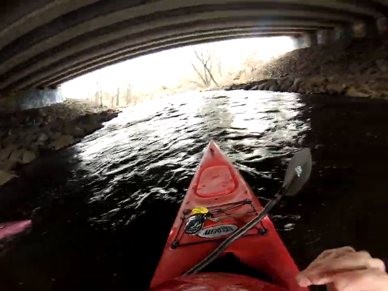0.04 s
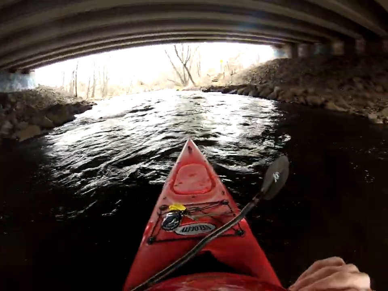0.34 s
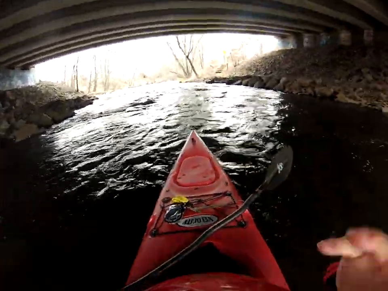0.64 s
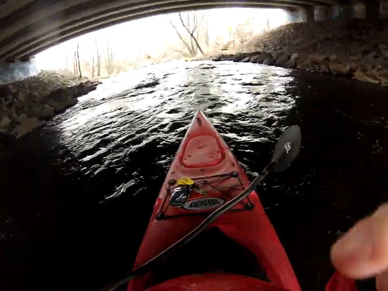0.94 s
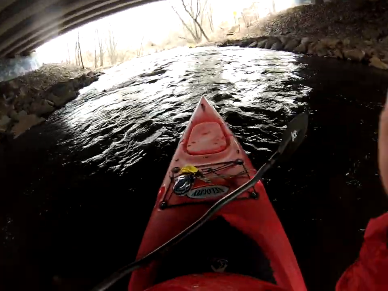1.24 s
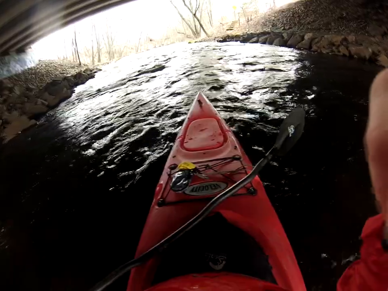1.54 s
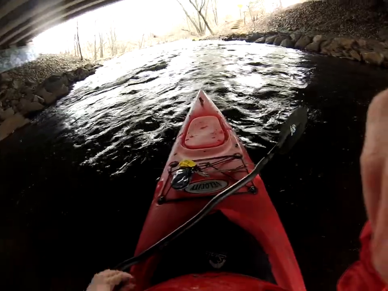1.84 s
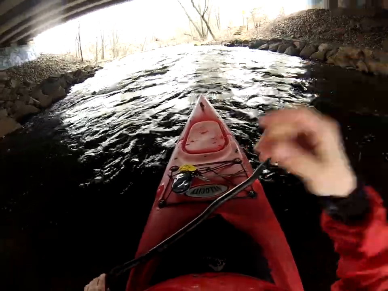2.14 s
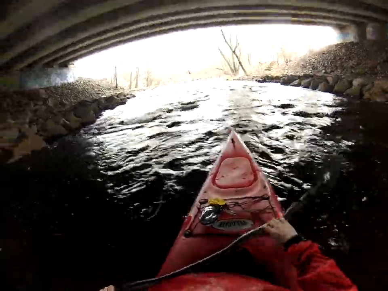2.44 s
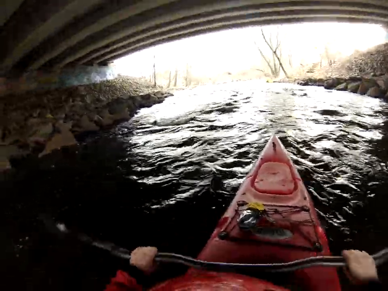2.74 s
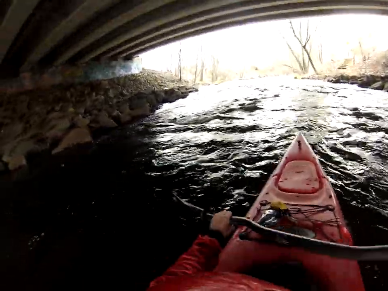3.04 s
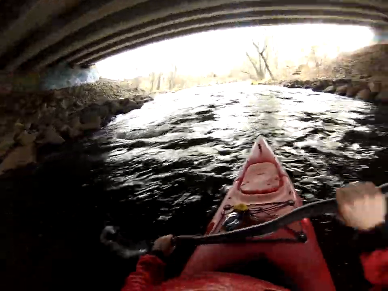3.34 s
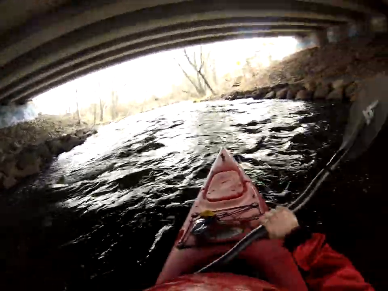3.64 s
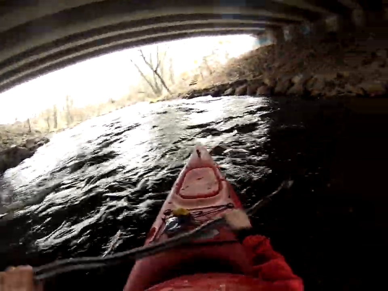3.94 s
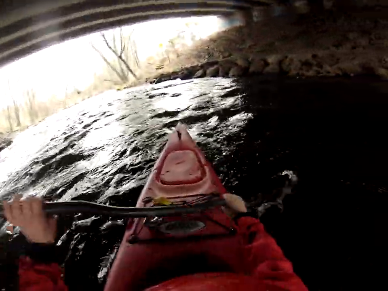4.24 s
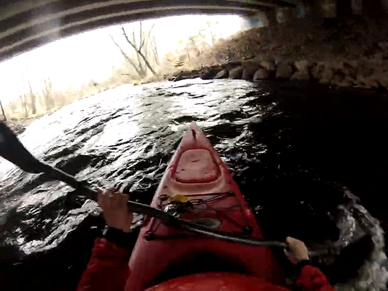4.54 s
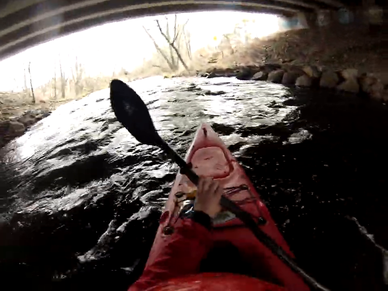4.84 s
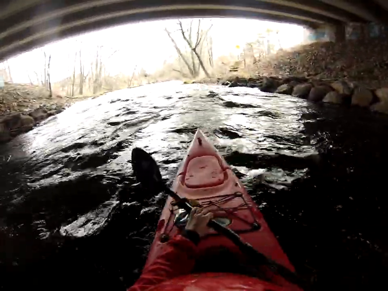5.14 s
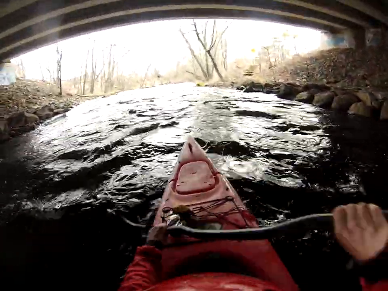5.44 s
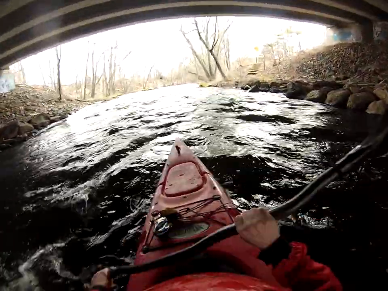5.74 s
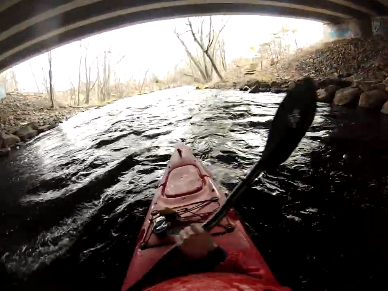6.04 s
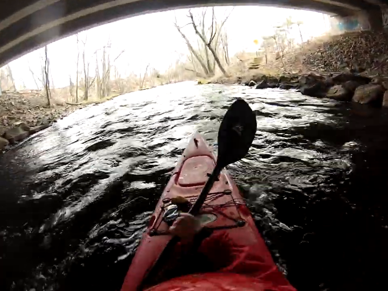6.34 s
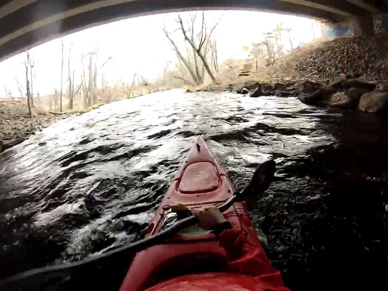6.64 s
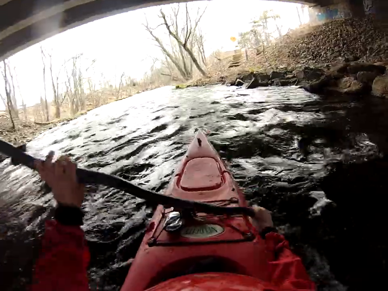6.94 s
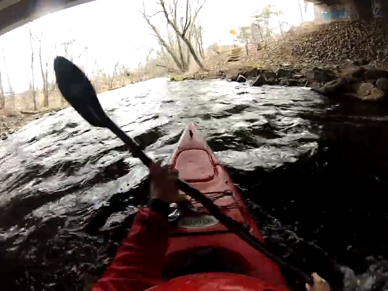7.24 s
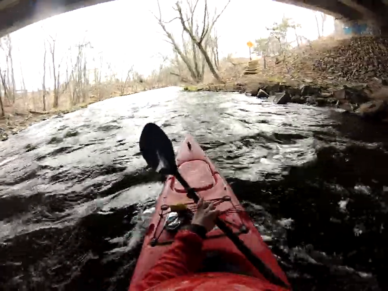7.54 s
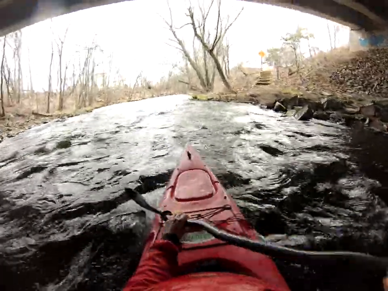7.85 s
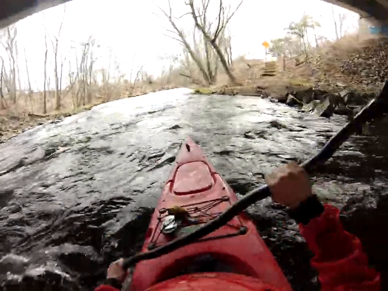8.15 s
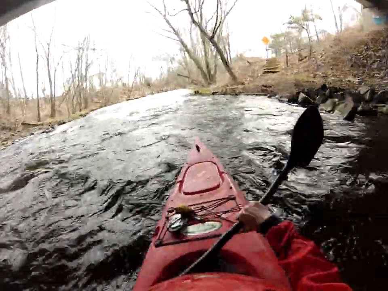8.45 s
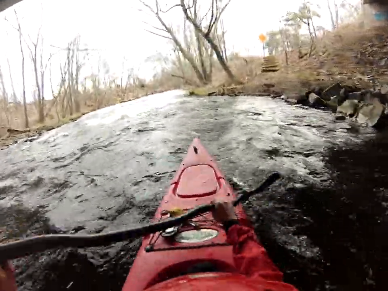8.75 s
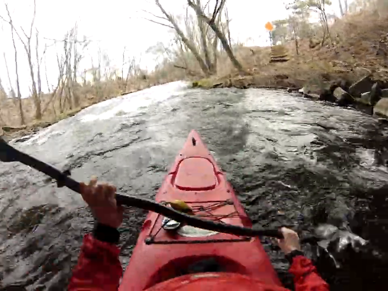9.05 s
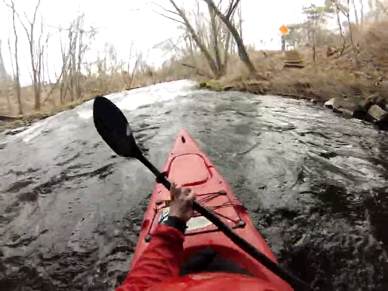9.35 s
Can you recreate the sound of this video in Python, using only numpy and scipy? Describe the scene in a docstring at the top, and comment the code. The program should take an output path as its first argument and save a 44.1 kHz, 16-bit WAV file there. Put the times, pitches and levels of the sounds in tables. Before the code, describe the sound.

Hollow-sounding river flow and soft kayak paddle strokes, with a loud burst of handling knocks and rubbing near the start.

```python
"""River water around a kayak: a wash of countless bubbles, swelling slowly as a riffle nears.
Paddle blades splash and drip faintly beside the hull. The water sounds hollow through the
waterproof case of a body-worn camera. Early on, a hand knocks and rubs the case, ringing its shell;
the springy mount thumps under the knocks and rumbles with every movement."""
import sys
import numpy as np
from scipy import signal
from scipy.fft import rfft, irfft, next_fast_len
from scipy.io import wavfile
from scipy.ndimage import uniform_filter1d

SR = 44100
rng = np.random.default_rng(int(sys.argv[2]) if len(sys.argv) > 2 else 0)


def unload_wav(signal):
    """Save mono or channel-first audio to the path in sys.argv[1] as 16-bit WAV at rate SR, clipped to [-1, 1]."""
    wavfile.write(
        sys.argv[1],
        SR,
        np.round(np.clip(np.atleast_2d(signal).T, -1, 1) * 32767).astype(np.int16),
    )


N = 414099
TIME_S = np.arange(N) / SR

# Current, louder towards the riffle: time_s, level_db
RIVER_LEVEL = [(2.1, -56), (2.71, -56), (4.23, -54.5), (5.02, -51.5), (5.53, -53), (7.21, -52.5),
               (7.86, -52), (9.39, -50.5)]
# Low band of the wash: freq_hz, relative_density_db
RUSH_SPECTRUM = [(90, -0.5), (200, -1.5), (300, -6), (500, -6.5), (780, -7.5), (1200, -5.5), (1600, 0),
                 (2200, -5.5), (2900, -12), (4500, -26), (9000, -53)]
# High band of the wash: freq_hz, relative_density_db
FIZZ_SPECTRUM = [(1500, -9.5), (2600, -6), (3600, -0.5), (5200, 0), (5800, -5.5), (7700, -6), (8400, -11.5),
                 (11000, -11), (15000, -26)]
# Paddle strokes: entry_s, pull_s, entry_splash_db, exit_splash_db, exit_jolt_db
PADDLE_STROKES = [(3.1, 0.56, -74, -63.5, -51), (4.26, 0.77, -67, -65, -44.5), (5.3, 0.4, -76, -70, -42.5),
                  (6.67, 0.47, -63, -71, -41.5), (7.76, 0.36, -62, -80, -37.5), (8.85, 0.42, -74, -68, -52)]
# Short patters of spray during and between strokes: peak_s, half_width_s, level_db
SPRAY_PATTERS = [(4.63, .074, -63.5), (5.122, 0.061, -73), (6.376, 0.056, -58.5), (8.44, 0.23, -64),
                 (8.89, .062, -61)]
# Biggest bubbles beside the hull: start_s, pitch_hz, level_db, t60_s
HULL_PLOPS = [(3.678, 1205, -50, .04), (3.904, 1720, -40.5, .02), (3.956, 775, -49.5, .042),
              (4.317, 1230, -47, .024), (4.913, 1736, -42, 0.02), (4.968, 1660, -40.5, .027),
              (5.193, 1600, -40, .013), (5.637, 856, -48, .075), (7.268, 1290, -47, 0.046),
              (7.648, 1455, -46, .069)]
# Fingers striking the case: start_s, crunch_gain_db, crunch_lowpass_hz, push_gain_db, push_s
FINGER_KNOCKS = [(.862, -1.5, 11100, -10, 0.0043), (.930, -21, 6000, -22, .0015),
                 (1.002, -23, 2000, -29, .0016), (1.1041, -11.5, 17000, -15, 0.0045),
                 (1.1139, -9, 2800, -15, 0.012), (1.1227, -22, 8000, -14, 0.0098),
                 (1.175, -15, 6000, -12, 0.0015), (1.1861, -4.5, 1980, -20.5, .011),
                 (1.1915, -10, 2000, -20, .0086), (1.272, -23, 2490, -44, 0.0055),
                 (1.311, -13, 8800, -21, 0.0087), (1.316, -7, 2620, -14, .0082),
                 (1.393, -14.5, 2320, -25, 0.0062), (1.985, -41, 2000, -30, 0.024)]
# Fingers sliding on the case, a hollow ringing under the hand:
# full_pressure_s, attack_s, hold_s, release_s, drag_db, hiss_db, sizzle_db, hollow_hz
FINGER_SLIDES = [ (0.872, .004, 0.016, 0.066, -41, -49, -60, 2220),
                 (.952, 0.0079, .005, 0.04, -41.5, -46.5, -65, 3700),
                 (0.977, 0.016, .024, .008, -43, -53, -49.5, 1640),
                 (1.114, 0.01, 0.0064, .055, -27, -26.5, -41, 2200),
                 (1.15, 0.025, 0.12, 0.033, -44.5, -47.5, -64, 1650),
                 (1.3, 0.05, .012, 0.013, -30, -25, -46, 1500),
                 (1.329, 0.06, 0.042, 0.087, -36.5, -39, -52, 2020),
                 (1.528, 0.083, 0.022, 0.051, -40.5, -47, -63, 1560),
                 (1.585, 0.063, 0.017, 0.07, -44, -51, -71, 2380),
                 (1.682, 0.059, 0.039, 0.11, -43.5, -49.5, -65, 2250),
                 (1.778, .08, 0.037, 0.096, -46.5, -51.5, -58, 1760),
                 (1.983, 0.046, .025, .04, -53.5, -54.5, -70, 1760)]
# Case resonances for outside sound: freq_hz, width_hz, boost_db
CASE_RESONANCES = [(1020, 124, 4), (1505, 360, 5), (2180, 130, 2.5), (3230, 210, -4.5), (3330, 160, 3.5),
                   (3700, 224, 7.5), (4400, 180, -4), (4780, 245, 5.5), (5760, 370, -1.5), (6650, 290, 4),
                   (7200, 320, -5), (7530, 270, 1.5), (14000, 450, 10)]
# Modes of the touched case: freq_hz, width_hz, gain_db
SHELL_MODES = [(275, 140, 6), (940, 310, -2.5), (1600, 610, 2.5), (2300, 330, 5), (2640, 550, 1),
               (3775, 104, 1.5), (4040, 100, -3), (4810, 160, 2.5), (5036, 240, -1.5), (6800, 730, -8),
               (7400, 250, -7), (7800, 400, -8.5), (9820, 1100, -11.5), (10630, 540, -10),
               (11550, 540, -9.5), (12700, 900, -14.5), (13800, 600, -13), (14620, 250, -16),
               (15000, 300, -15)]
# Modes of the camera on its mount: freq_hz, width_hz, gain_db
SWING_MODES = [(48.7, 9, 14.5), (68, 26, 8), (84.5, 45, 1), (165, 24, -0.5)]
# Mount wobble: freq_hz, relative_density_db
WOBBLE_SPECTRUM = [(8, 9), (14, 3), (24, -1.5), (36, -1.5), (48, 1), (60, -10.5), (80, -22.5), (120, -30.5),
                   (300, -44)]
# Paddler reaching and shifting: peak_s, half_width_s, level_db
BODY_SWAYS = [(.14, 0.077, -36.5), (1.405, 0.13, -29), (1.755, 0.2, -38.5), (1.978, 0.055, -31),
              (4.128, .12, -42)]


def river(babble_db=-4, spray_db=-6, surge_db=0.22, rush_db=-2.0, fizz_db=-10.0, fizz_db_per_db=1.21):
    """Far bubbles merge into a smooth wash; nearer ones stand out as babble and fizz."""
    flow_db = np.interp(TIME_S, *np.transpose(RIVER_LEVEL))
    rush_gain = from_db(flow_db + rush_db)
    fizz_gain = from_db(flow_db.mean() + fizz_db_per_db * (flow_db - flow_db.mean()) + fizz_db)
    babble = from_db(babble_db) * bubbles(1500, low_hz=350, high_hz=3004, t60_cycles=19.7, spread_db=2.5)
    spray = from_db(spray_db) * bubbles(2500, low_hz=2800, high_hz=12950, t60_cycles=83, spread_db=4.5)
    rush = coloured(rng.standard_normal(N), RUSH_SPECTRUM)
    rush += np.std(babble) * coloured(babble, RUSH_SPECTRUM)
    fizz = coloured(rng.standard_normal(N), FIZZ_SPECTRUM)
    fizz += np.std(spray) * coloured(spray, FIZZ_SPECTRUM)
    wash = rush_gain * unit_rms(rush) + fizz_gain * unit_rms(fizz)
    return wash * from_db(surge_db * drift(corner_hz=12.0))


def paddle(splash_half_width_s=0.12, spray_db=-7.5):
    """On entry and exit a blade stirs up big, low bubbles and throws drops; spray patters in between."""
    spray = bubbles(1100, low_hz=3090, high_hz=11900, t60_cycles=66, spread_db=4.0)
    spray = unit_rms(cut(spray, 6500, "low"))
    gurgle = bubbles(500, low_hz=162, high_hz=1500, t60_cycles=8.2, spread_db=2.0)
    gurgle = unit_rms(cut(gurgle, 500, "low", order=1))
    splash = sum(from_db(entry_db) * swell(entry_s, splash_half_width_s)
                 + from_db(exit_db) * swell(entry_s + pull_s, splash_half_width_s)
                 for entry_s, pull_s, entry_db, exit_db, _ in PADDLE_STROKES)
    return splash * gurgle + (from_db(spray_db) * splash + swells(SPRAY_PATTERS)) * spray


def drips(count=16, low_hz=3310, high_hz=7260, drip_db=-55, spread_db=1.5, drip_t60_s=0.022, rise=0.072):
    """Plops and small random drips: each trapped bubble rings, rising in pitch near the surface."""
    first_entry_s, first_pull_s = PADDLE_STROKES[0][:2]
    small = [(rng.uniform(first_entry_s + first_pull_s, N / SR),
              low_hz * (high_hz / low_hz) ** rng.random(),
              drip_db + spread_db * rng.standard_normal(),
              drip_t60_s) for _ in range(count)]
    out = np.zeros(N + SR)
    for start_s, pitch_hz, level_db, t60_s in HULL_PLOPS + small:
        age_s = np.arange(int(t60_s * SR)) / SR
        decay = np.exp(-np.log(1000) * age_s / t60_s)
        phase_rad = 2 * np.pi * pitch_hz * age_s * (1 + rise * age_s / t60_s)
        start = int(start_s * SR)
        out[start:start + len(age_s)] += from_db(level_db) * decay * np.sin(phase_rad)
    return out[:N]


def knocks(contact_s=0.001, tail_db=-23, tail_s=0.0081, shell_low_hz=1150, mount_top_hz=330):
    """A finger lands with a short crunch on the shell; its push sets the mount swinging."""
    crunch, push = np.zeros(N), np.zeros(N)
    age_s = np.arange(SR // 20) / SR
    decay = np.exp(-age_s / contact_s) + from_db(tail_db) * np.exp(-age_s / tail_s)
    for start_s, crunch_db, lowpass_hz, push_db, push_s in FINGER_KNOCKS:
        start = round(start_s * SR)
        span = slice(start, start + len(age_s))
        slips = decay * rng.choice([-1, 1], len(age_s))
        crunch[span] += from_db(crunch_db) * cut(slips, lowpass_hz, "low")
        push[span] -= from_db(push_db) * np.sin(np.pi * np.minimum(age_s / push_s, 1)) ** 2
    swing = sum(from_db(db) * resonance(push + 1e-18, hz, width_hz) for hz, width_hz, db in SWING_MODES)
    # Stiff shell: highs. Heavy camera: lows.
    return cut(shell_ring(crunch), shell_low_hz, "high") + cut(swing, mount_top_hz, "low")


def rubbing(low_hz=250, split_hz=3000, sizzle_hz=9000, hollow_db=10, hollow_width_hz=600, stutter_db=2):
    """Skin sticks and slips on the shell: coarse slips drag low, fine ones hiss and sizzle."""
    coarse = cut(shell_ring(clicks(per_s=6100, spread_db=2.0)), low_hz, "high")
    fine = shell_ring(clicks(per_s=5400, spread_db=1.0))
    hiss = unit_rms(cut(cut(fine, split_hz, "high", order=4), sizzle_hz, "low", order=4))
    sizzle = unit_rms(cut(fine, sizzle_hz, "high", order=5))
    out = np.zeros(N)
    for *timing_s, drag_db, hiss_db, sizzle_db, hollow_hz in FINGER_SLIDES:
        hollow = from_db(hollow_db) * resonance(coarse, hollow_hz, hollow_width_hz)
        drag = unit_rms(cut(coarse + hollow, split_hz, "low", order=3))
        friction = from_db(drag_db) * drag + from_db(hiss_db) * hiss + from_db(sizzle_db) * sizzle
        out += finger_pressure(*timing_s) * friction
    return out * from_db(stutter_db * drift(corner_hz=46))


def finger_pressure(full_s, attack_s, hold_s, release_s, fade_db=26):
    """A finger presses, holds, lets go; the level moves fade_db per attack_s or release_s."""
    before = np.maximum(full_s - TIME_S, 0) / attack_s
    after = np.maximum(TIME_S - full_s - hold_s, 0) / release_s
    return from_db(-fade_db * np.minimum(before + after, 10))


def shell_ring(force):
    """Force on the shell rings its modes, right at the microphone."""
    return sum((-1) ** k * from_db(db) * resonance(force + 1e-18, hz, width_hz)
               for k, (hz, width_hz, db) in enumerate(SHELL_MODES))


def through_case(sound):
    """The closed case resonates, making outside sound hollow."""
    return sound + sum((from_db(boost_db) - 1) * resonance(sound, hz, width_hz)
                       for hz, width_hz, boost_db in CASE_RESONANCES)


def mount_rumble(rock_db=-47.5, rock_db_per_s=0.5, jolt_half_width_s=0.13, entry_db=-9, steadiness=0.76):
    """The camera wobbles on its mount as the boat rocks, more with each stroke and reach."""
    rocking = from_db(rock_db + rock_db_per_s * TIME_S)
    jolts = sum(from_db(jolt_db + entry_db) * swell(entry_s, jolt_half_width_s)
                + from_db(jolt_db) * swell(entry_s + pull_s, jolt_half_width_s)
                for entry_s, pull_s, _, _, jolt_db in PADDLE_STROKES)
    shake = np.sqrt(rocking ** 2 + jolts ** 2 + swells(BODY_SWAYS) ** 2)
    wobble = coloured(rng.standard_normal(N), WOBBLE_SPECTRUM)
    local_power = uniform_filter1d(wobble ** 2, size=6000)
    return shake * unit_rms(wobble / local_power ** (steadiness / 2))


def bubbles(per_s, low_hz, high_hz, t60_cycles, spread_db, sizes=28):
    """Bubbles form at random, each ringing at the pitch of its size; rms 1."""
    births = clicks(per_s, spread_db)
    size = rng.integers(0, sizes, N)
    pitches_hz = np.geomspace(low_hz, high_hz, sizes)
    rings = (hz * ring(births * (size == k), hz, t60_cycles / hz) for k, hz in enumerate(pitches_hz))
    return unit_rms(sum(rings))


def clicks(per_s, spread_db):
    """Random impulses, many small, a few large."""
    heights = from_db(spread_db * np.minimum(rng.exponential(1, N), 4)) * rng.choice([-1, 1], N)
    return heights * (rng.random(N) < per_s / SR)


def ring(impulses, hz, t60_s):
    """One decaying sine per impulse."""
    radius, step_rad = np.exp(-np.log(1000) / (t60_s * SR)), 2 * np.pi * hz / SR
    feedback = [1, -2 * radius * np.cos(step_rad), radius ** 2]
    return signal.lfilter([0, np.sin(step_rad)], feedback, impulses + 1e-18)


def resonance(x, hz, width_hz):
    """Band-pass, peak gain 1."""
    radius = np.exp(-np.pi * width_hz / SR)
    feedback = [1, -2 * radius * np.cos(2 * np.pi * hz / SR), radius ** 2]
    return signal.lfilter(np.array([1, 0, -1]) * (1 - radius ** 2) / 2, feedback, x)


def cut(x, hz, kind, order=2):
    """Low- or high-pass."""
    return signal.sosfilt(signal.butter(order, hz, kind, fs=SR, output="sos"), x)


def coloured(x, spectrum):
    """Shape by a spectrum table, rolled off past its ends; rms 1."""
    size = next_fast_len(N)
    hz, db = np.transpose(spectrum)
    bins_hz = np.maximum(np.arange(size // 2 + 1) * SR / size, 1)
    gain = from_db(np.interp(np.log(bins_hz), np.log(hz), db))
    gain /= np.sqrt(1 + (hz[0] / 2 / bins_hz) ** 4 + (bins_hz / 2 / hz[-1]) ** 4)
    return unit_rms(irfft(rfft(x, size) * gain, size)[:N])


def drift(corner_hz):
    """Low-passed noise; rms 1."""
    bins_hz = np.arange(N // 2 + 1) * SR / N
    return unit_rms(irfft(rfft(rng.standard_normal(N)) / (1 + (bins_hz / corner_hz) ** 2), N))


def swell(peak_s, half_width_s):
    """Bell curve, 1/e at the half-width."""
    return np.exp(-np.minimum(((TIME_S - peak_s) / half_width_s) ** 2, 50))


def swells(table):
    """Sum of bell curves, one per row."""
    return sum(from_db(db) * swell(peak_s, half_width_s) for peak_s, half_width_s, db in table)


def from_db(db):
    """Decibels to gain."""
    return 10 ** (np.asarray(db) / 20)


def unit_rms(x):
    """Scale to rms 1."""
    return x / np.sqrt(np.mean(x ** 2) + 1e-20)


def scene():
    """Water comes through the case; touches and shaking act on it directly. Mono."""
    water = through_case(river() + paddle() + drips())
    return (water + rubbing() + knocks() + mount_rumble())[None]


def record(dry, hiss_db=-71.5, cutoff_hz=15300):
    """Faint microphone hiss, then a steep low-pass."""
    noisy = dry + from_db(hiss_db) * rng.standard_normal(dry.shape)
    return signal.sosfilt(signal.ellip(10, 0.2, 70, cutoff_hz, fs=SR, output="sos"), noisy)


dry = scene()
out = record(dry)
unload_wav(out)
```